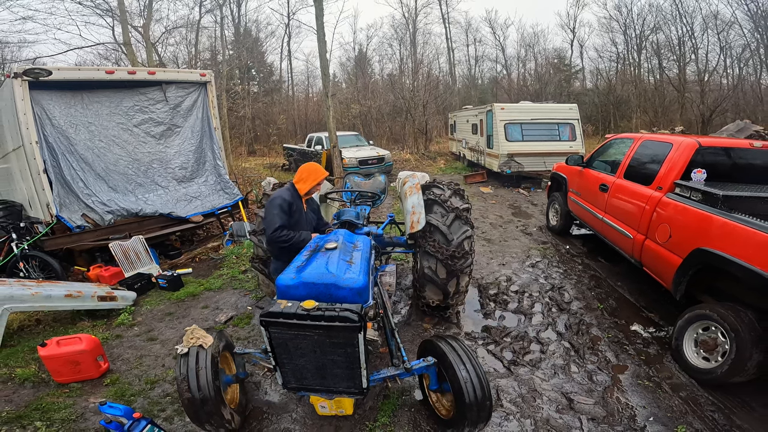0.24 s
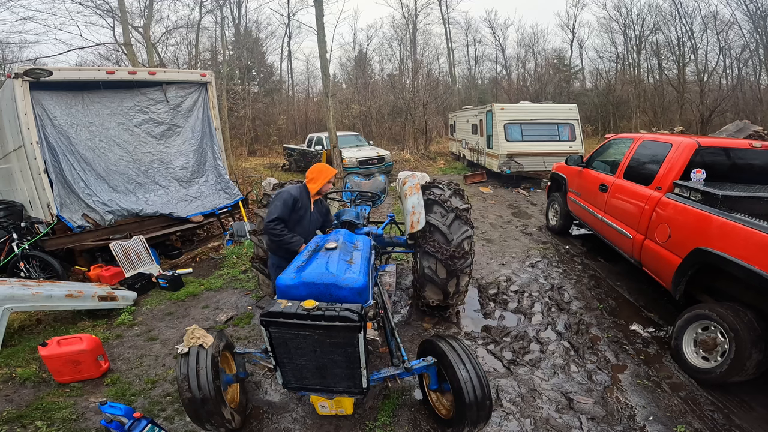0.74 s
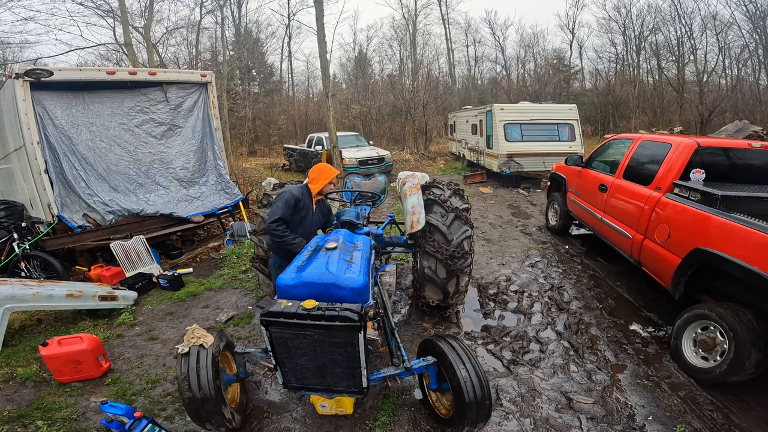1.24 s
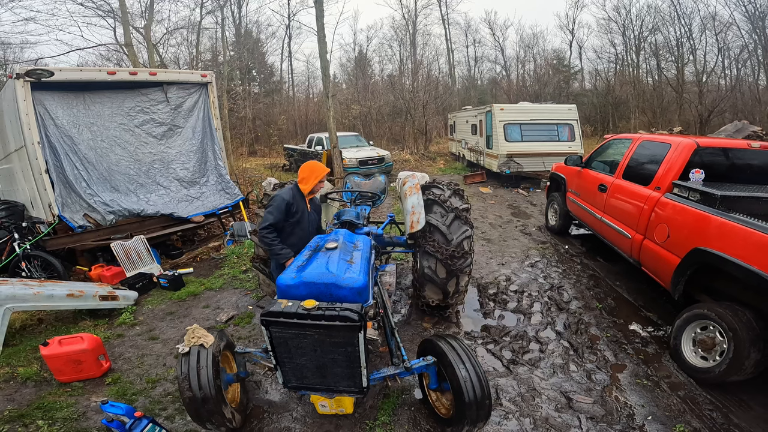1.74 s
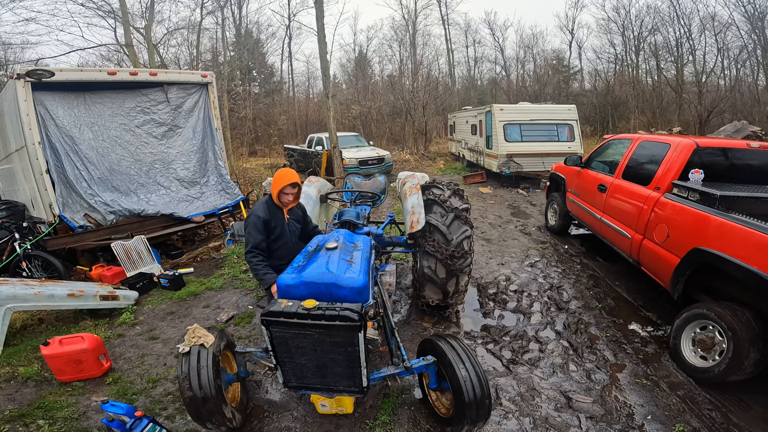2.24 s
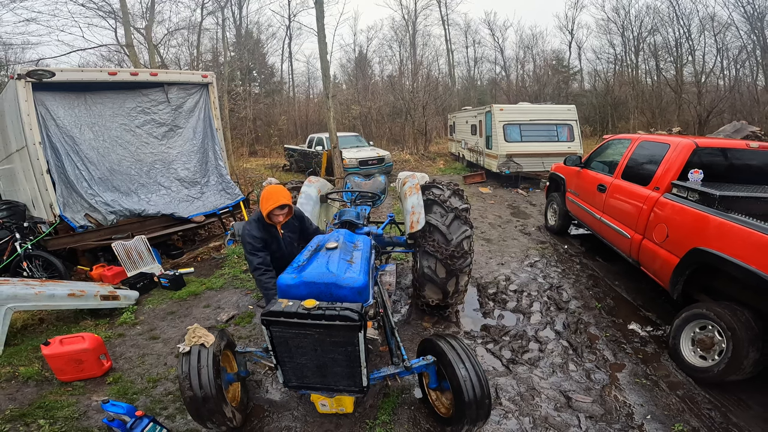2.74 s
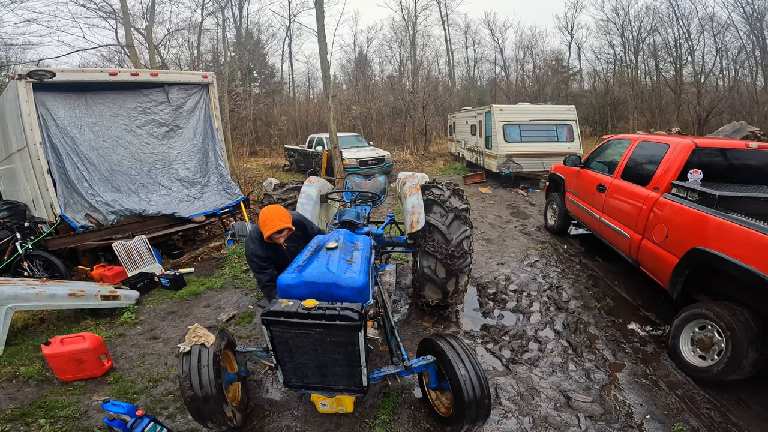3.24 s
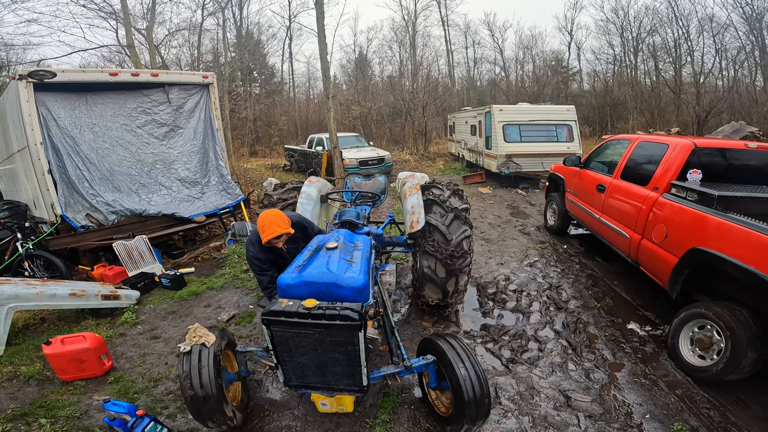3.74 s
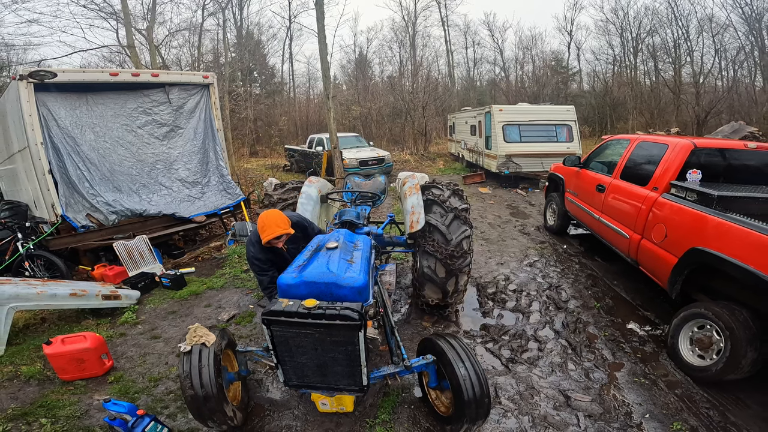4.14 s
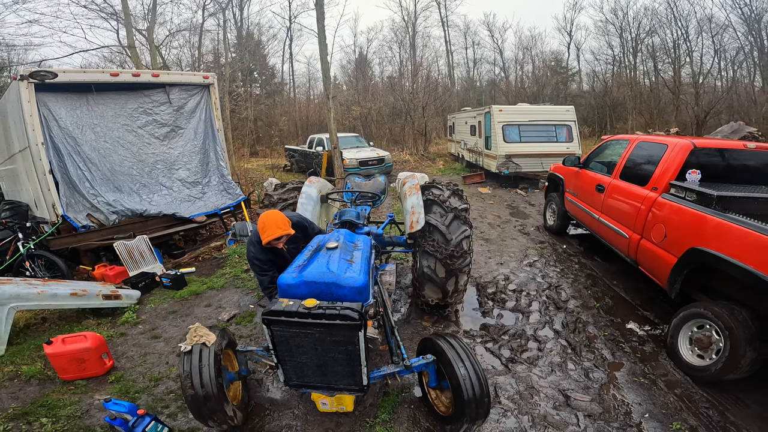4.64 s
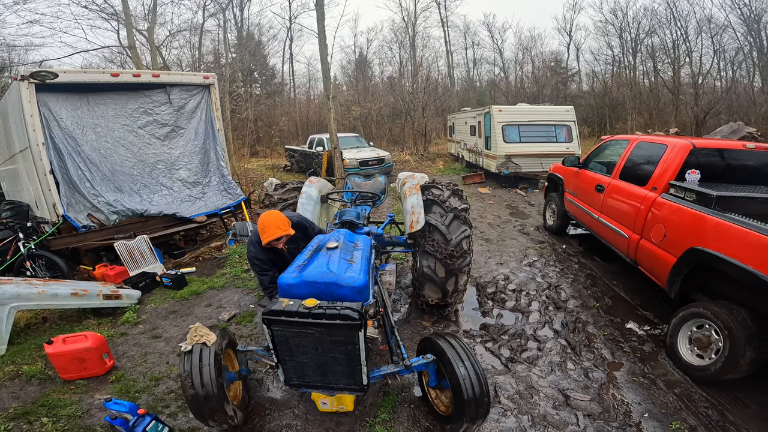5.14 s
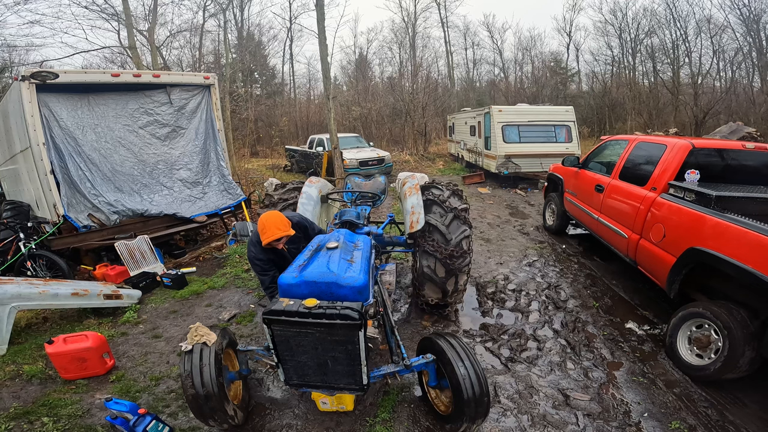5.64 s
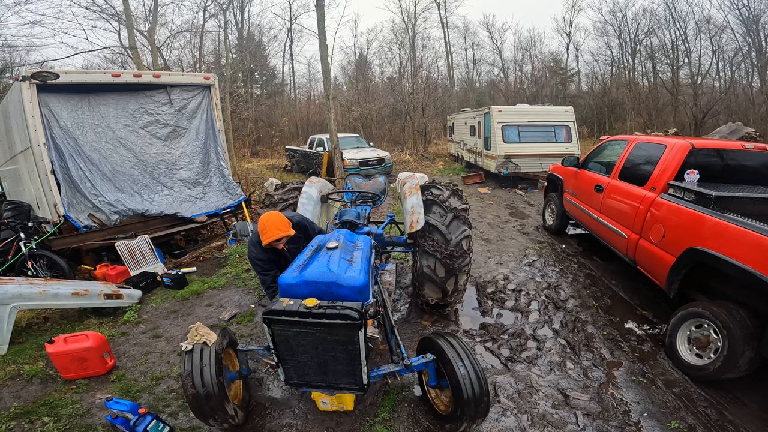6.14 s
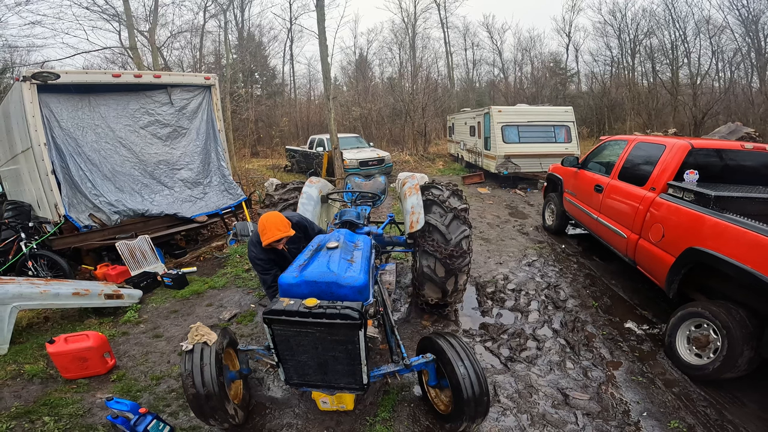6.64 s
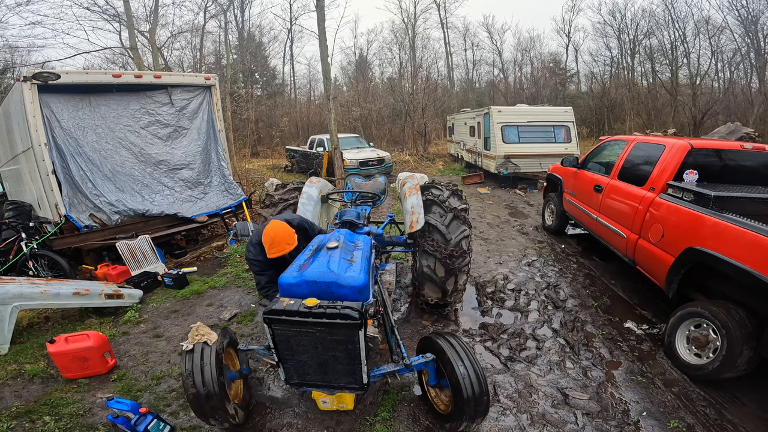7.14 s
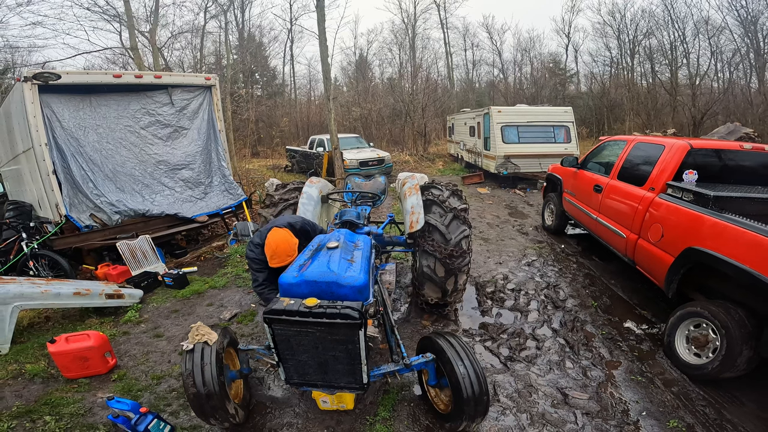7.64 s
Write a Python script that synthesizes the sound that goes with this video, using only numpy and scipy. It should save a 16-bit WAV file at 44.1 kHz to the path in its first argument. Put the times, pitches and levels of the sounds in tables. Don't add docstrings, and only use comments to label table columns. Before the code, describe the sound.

Light rain and small handling knocks in a wet yard, then a tractor starter clacks in and cranks steadily, whining and chugging without catching.

```python
import sys
import numpy as np
from scipy import signal
from scipy.io import wavfile
from scipy.ndimage import uniform_filter1d

SR = 44100
rng = np.random.default_rng(int(sys.argv[2]) if len(sys.argv) > 2 else 0)


def level_to_linear(level):
    exponent = np.asarray(level, float) / 20
    return 10 ** exponent


def wrap_up_sound(samples):
    columns = np.atleast_2d(samples).T
    tamed = np.clip(columns, -1, 1)
    steps = np.round(tamed * 32767).astype(np.int16)
    wavfile.write(sys.argv[1], SR, steps)


N = 348390
LEFT_RIGHT = np.array([[1], [-1]])

# start_s, teeth_hz, whine_db, clatter_db, groan_db
SPIN_UP = [
    (2.628, 120, -63, -27, -60),
    (2.636, 140.7, -20, -25, -22),
    (2.66, 190.4, -20, -32.5, -17.5),
    (2.72, 250.1, -21.5, -28, -18.5),
    (2.76, 281.5, -14.5, -30, -27.5),
    (2.81, 318.9, -31, -27.5, -19.5),
    (2.836, 363.7, -16.5, -29.5, -31),
]
# release_s, clatter_db, unloading_db
STROKES = [(2.84, -1, 1), (3.015, 2.5, -1), (3.163, -1, -4.5), (3.296, 0.0, -4), (3.442, -2, -5),
           (3.576, 3, -7), (3.695, -0.5, -12), (3.823, 0.3, -5.5), (3.951, 1.2, -10.5), (4.079, 0.5, -6),
           (4.212, 1.5, -9.5), (4.351, 0, -6), (4.489, -1.2, -8.5), (4.633, 0.7, -12), (4.771, 0.4, -9.5),
           (4.9, -0.7, -6.5), (5.048, -0.1, -10), (5.188, -0.2, -7), (5.327, -1, -8), (5.461, 0, -3),
           (5.583, -3, 0), (5.749, -1.5, -2), (5.904, -1.7, -3), (6.047, -0.5, -1.5), (6.206, 1.2, -5.5),
           (6.354, -1, -6.5), (6.506, 0.3, -9), (6.633, 1, -2), (6.792, -1.2, -8), (6.939, -0.5, -6.5),
           (7.082, -0.8, -8.5), (7.216, 1.5, -2.2), (7.371, -1.5, -10), (7.516, 0, -8.5), (7.65, 0, -10),
           (7.787, 1, -4)]
LAST_RELEASE_S = 7.93
# start_s, push_db, hiss_db
PUFFS = [(2.981, -25, -50), (3.127, -13, -23), (3.41, -11.5, -28.5), (3.543, -11.5, -18.5),
         (3.793, -8, -21.5), (3.922, -19, -29.5), (4.05, -21, -32.5), (4.189, -29, -53),
         (4.319, -13.5, -26), (4.457, -14, -27.5), (4.59, -26.5, -48), (4.735, -20.0, -31),
         (4.875, -14, -28), (5.012, -13.5, -27), (5.225, -48.0, -36), (5.359, -41, -48), (5.52, -37, -34),
         (5.585, -25, -47), (5.738, -25, -50)]
# start_s, peak_db, pitch_hz, left_right_db
LASH_BLOWS = [
    (2.631, -14, 1240, -5),
    (3.174, -13, 1447, 2),
    (7.527, -22, 1009, 0),
]


def rms_one(x):
    return x / np.sqrt(np.mean(x ** 2) + 1e-20)


def in_time(s, values):
    return np.interp(np.arange(N) / SR, s, values)


def at_hz(points, hz):
    points_hz, values = np.transpose(points)
    return np.interp(np.log(hz), np.log(points_hz), values)


def filtered(x, order, hz, kind="low"):
    return signal.sosfilt(signal.butter(order, hz, kind, fs=SR, output="sos"), x)


def drift(rate_hz):
    r = np.exp(-40 * np.pi * rate_hz / SR)
    slow = signal.lfilter([1], [1, -2 * r, r * r], rng.standard_normal(N // 20 + 4002))[4000:]
    return np.interp(np.arange(N) / 20, np.arange(len(slow)), rms_one(slow))


def resonances(x, modes):
    out = 0
    for k, (hz, width_hz, db) in enumerate(modes):
        r = np.exp(-np.pi * width_hz / SR)
        b = (1 - r * r) / 2 * np.array([1, 0, -1])
        a = [1, -2 * r * np.cos(2 * np.pi * hz / SR), r * r]
        out = out + (-1) ** k * level_to_linear(db) * signal.lfilter(b, a, x + 1e-18)
    return out


def coloured(pair, spectrum, patchy_db, likeness):
    # pitch_hz, left_right_db
    lean = [(60, -1), (240, 0.5), (950, -1), (3770, 3), (15000, 8)]
    out, edges_hz = 0, 110 * 2 ** np.arange(0, 7.6, .5)
    for k, (low_hz, high_hz) in enumerate(zip(edges_hz, edges_hz[1:])):
        mid, side = filtered(pair[k % 2], 2, [low_hz, high_hz], "band")
        hz = np.sqrt(low_hz * high_hz)
        alike = np.clip(at_hz(likeness, hz), 0, 1)
        level_db = at_hz(spectrum, hz) + patchy_db * drift(10.4)
        gain = level_to_linear(level_db + at_hz(lean, hz) * LEFT_RIGHT / 2)
        out = out + gain * (np.sqrt(1 + alike) * mid + np.sqrt(1 - alike) * side * LEFT_RIGHT)
    return rms_one(out)


def taps(table, decay_s, looseness, trim_db):
    out, t = np.zeros((2, N)), np.arange(SR // 10) / SR
    noise = rng.standard_normal((len(table), len(t))) * np.exp(-t / decay_s)
    for (s, db, hz, pan_db), burst in zip(table, noise):
        tap = resonances(burst, [(hz, looseness * hz, 0)])
        tap = resonances(tap, [(hz, 3.1 * hz, 0)])
        gain = level_to_linear(db + trim_db + pan_db * LEFT_RIGHT / 2)
        out[:, round(s * SR):][:, :len(t)] += gain * tap / abs(tap).max()
    return out


def rain():
    # pitch_hz, level_db
    spectrum = [(71, -36), (120, -10.5), (153, 2), (180, -4.5), (310, -12.5), (446, -9.5), (655, -13),
                (923, -13.5), (1090, -7.5), (2200, -12.5), (4030, -18), (5350, -18), (12300, -40),
                (15000, -43)]
    # pitch_hz, likeness_0_to_1
    yard_likeness = [(60, 0.58), (180, 0.92), (550, 0.81), (1650, 0.61), (4970, 0.56), (15000, 0.37)]
    rain_db, shift_db = -37, 0.4
    landed = rng.random((2, 2, N)) < 250 / SR
    drops = 3.0 * landed * level_to_linear(2.8 * rng.exponential(1, (2, 2, N)))
    hiss = coloured(rng.standard_normal((2, 2, N)) + drops, spectrum, patchy_db=1.22, likeness=yard_likeness)
    return level_to_linear(rain_db + in_time([2.6, 2.65], [0, shift_db])) * hiss


def wind():
    # start_s, level_db
    gusts = [(0.0, -47), (0.37, -45), (0.72, -47.5), (1.08, -42.5), (1.47, -45.5), (2.42, -43.5),
             (2.66, -42), (3.63, -44), (3.98, -42), (4.95, -44), (5.19, -49), (6.4, -50), (6.58, -47),
             (7.9, -55)]
    mid, side = filtered(rng.standard_normal((2, N)), 2, [22, 75], "band")
    buffet = rms_one(mid + (0.13 * side + 0.039 * mid) * LEFT_RIGHT)
    return buffet * level_to_linear(in_time(*np.transpose(gusts)) + 3.1 * drift(11) + 5.0)


def drips():
    # start_s, peak_db, pitch_hz, left_right_db
    near_drops = [(0.0954, -41, 5500, 3.0), (0.2684, -32, 5870, 0.5), (0.4054, -41, 6650, 3.0),
                  (0.4773, -33, 7000, 4.0), (0.6034, -30, 6900, 2.5), (0.7714, -27, 5870, 1.5),
                  (0.8654, -28, 7000, 4), (1.18, -28, 6030, 8), (1.2291, -31, 7000, 6),
                  (1.5034, -43, 7110, 2.5), (1.7275, -26, 5900, 10), (1.8063, -34, 6830, 2.5),
                  (2.0394, -27, 5590, 1.5), (2.1154, -27, 5520, 3.5), (2.2504, -28, 6040, 4)]
    return taps(near_drops, decay_s=.003, looseness=0.24, trim_db=-4.5)


def handling():
    # start_s, peak_db, pitch_hz, left_right_db
    knocks = [(0.134, -31, 1740, 1.5), (0.657, -27.5, 1320, 6), (0.938, -29, 2570, 1.0),
              (1.134, -26, 1700, 2), (1.15, -28, 800, 2), (1.227, -31, 1000, 1.5), (1.289, -29.5, 800, 1.0),
              (1.339, -26, 900, -0.5), (1.359, -33, 1000, 0.5), (1.956, -32, 1180, 5),
              (2.09, -23, 1120, -3), (2.12, -31, 1300, 3), (2.279, -30, 2800, 0.0), (2.399, -34, 450, 8),
              (2.459, -29, 447, 6), (2.544, -20, 1390, 2)]
    # start_s, peak_db, pitch_hz, left_right_db
    ticks = [
        (1.182, -24, 2200, 5),
        (2.116, -18, 900, 3),
        (2.285, -20, 1900, .1),
        (2.308, -21.5, 500, -10),
        (2.341, -26, 1410, 1.5),
    ]
    # start_s, peak_db, pitch_hz, left_right_db
    rustles = [
        (1.13, -32, 900, 2),
        (1.275, -32, 900, 1.5),
        (1.335, -28, 700, .1),
        (2.085, -24, 1500, .1),
        (2.125, -31, 1300, 2),
    ]
    out = taps(knocks, decay_s=0.0093, looseness=0.27, trim_db=-1.5)
    out += taps(ticks, decay_s=0.0016, looseness=0.61, trim_db=-1.0)
    return out + taps(rustles, decay_s=.03, looseness=0.77, trim_db=-1.5)


def squeaks():
    # start_s, peak_db, pitch_hz, left_right_db
    whistles = [
        (1.46, -35, 3510, 2),
        (4.303, -18, 6050, 1),
        (4.858, -18, 6200, 1),
    ]
    return taps(whistles, decay_s=.016, looseness=.025, trim_db=0)


def strokes():
    # extra_speed_loss_0_to_1, whine_db, frame_shake_db
    cylinders = [(0.01, 0.5, 1), (0, 0.3, -1), (0.01, -0.4, 1), (0, .5, -2.5)]
    s = np.transpose(STROKES)[0]
    share = in_time(np.append(s, LAST_RELEASE_S), np.arange(len(s) + 1)) % 1
    return s, share, np.tile(np.transpose(cylinders), len(s) // len(cylinders))


def frame():
    # stroke_share, level_db
    shake_swing = [(0, -4.5), (.25, -10), (.45, -3.5), (.62, -1), (.85, 0.5), (1, -5.5)]
    running_db, take_up_s = -31, .025
    lurch_db, lurch_s, lurch_fade_db_per_s = 12, 2.65, 21
    rock_db, rock_t60_s = -35, 0.42
    s, share, (_, _, shake_db) = strokes()
    t, shake = np.arange(N) / SR, rng.standard_normal(N)
    boom = resonances(shake, [(137, 42, -16.5), (163.3, 13.3, -1.5), (178.5, 15, -1.5)])
    boom = filtered(boom, 2, 260)
    boom = boom / (uniform_filter1d(boom ** 2, size=900) + 1e-12) ** 0.21
    stroke_db = (t > s[0]) * (np.interp(share, *np.transpose(shake_swing)) + in_time(s + 0.11, shake_db))
    first_db = np.maximum(lurch_db - lurch_fade_db_per_s * abs(t - lurch_s), 0)
    since_s = share * in_time(s[1:], np.diff(s))
    fade_db = uniform_filter1d(60 * since_s / rock_t60_s, size=1000)
    rock = rms_one(resonances(shake, [(66.4, 13.5, 0)])) * level_to_linear(rock_db - fade_db)
    moving = np.clip((t - SPIN_UP[0][0]) / take_up_s, 0, 1)
    return (rms_one(boom) * level_to_linear(running_db + stroke_db + first_db) + rock) * moving


def exhaust():
    push, hiss = np.zeros(N), np.zeros(N)
    t = np.arange(-.04, .08, 1 / SR)
    # centre_s, width_s, size
    pulses = [(-.021, 0.00092, 0.28), (-.007, 0.00086, 0.33), (0, 0.0026, -0.83),
              (.012, 0.0028, 0.33), (.029, .004, .3), (.044, 0.013, 0.046)]
    shape = sum(size * np.exp(-.5 * ((t - at) / width) ** 2) for at, width, size in pulses)
    opening = np.exp((t + 0.014) / 0.0026)
    closing = np.exp(-(np.maximum(t + 0.026, 0) / 0.028) ** 2)
    burst = np.where(t < -.018, opening, closing)
    for s, push_db, hiss_db in PUFFS:
        i = round((s - .04) * SR)
        push[i:i + len(t)] += level_to_linear(push_db) * shape
        hiss[i:i + len(t)] += level_to_linear(hiss_db) * burst
    mid, side = filtered(rng.standard_normal((2, N)), 2, [4500, 10500], "band")
    jet = rms_one(mid + 0.34 * side * LEFT_RIGHT)
    low = rms_one(filtered(rng.standard_normal(N), 1, [120, 1500], "band"))
    push += resonances(push, [(120, 67, 5.4), (220, 53, 12.0), (310, 93, 8.3)])
    return push + hiss * (jet + level_to_linear(6.0) * low)


def clack():
    # pitch_hz, level_db, fade_s (time to fall by 110 dB)
    ring_modes = [(3460, 7, 0.022), (4250, 12, 0.035), (5170, 3, 0.05), (5400, 3, 0.05), (6700, 15, 0.048),
                  (8150, -16, 0.15), (8500, -23, 0.099), (9491, -26, 0.088), (12100, -3, 0.05)]
    # start_s, level_db
    hits = [
        (2.609, -17),
        (2.6116, -21),
        (2.617, -16.5),
        (2.633, -40),
    ]
    out, t = np.zeros(N), np.arange(SR // 5) / SR
    for s, hit_db in hits:
        ring = 0
        for hz, level_db, fade_s in ring_modes:
            ring = ring + level_to_linear(level_db + rng.normal(0, 5.3) - 110 * t / fade_s) * np.sin(2 * np.pi * hz * t)
        crack = 1.6 * rng.standard_normal(len(t)) * np.exp(-t / 0.0075)
        crack = filtered(crack, 1, 9000)
        out[round(s * SR):][:len(t)] += level_to_linear(hit_db) * (.2 * ring + 1.15 * crack)
    return filtered(out, 2, [600, 12500], "band")


def lash():
    return taps(LASH_BLOWS, decay_s=0.028, looseness=0.3, trim_db=-4.0)


def floating():
    gap_s, gap_db = .01, -6
    t = np.arange(N) / SR
    return level_to_linear(sum(gap_db * (t < s) * np.exp(-((s - t) / gap_s) ** 2) for s, *_ in LASH_BLOWS[1:]))


def crank():
    # start_s, free_teeth_hz, compression_loss_0_to_1, effort_db, held_stroke_share
    shaft_course = [(2.84, 395, 0.11, 2, 0.31), (3.012, 457, 0.07, -2, .3), (3.164, 507, 0.16, 1, .25),
                    (3.294, 486.5, 0.09, -0.5, .25), (3.441, 524.4, .05, -1.5, .3),
                    (3.573, 545.3, .1, -0.5, .3), (3.822, 539.2, 0.08, -0.5, .3),
                    (4.077, 521.9, 0.15, 2, .25), (4.63, 504.8, 0.18, 0.3, 0.26),
                    (5.187, 505.5, .16, 0, .3), (5.457, 489.5, 0.13, 1, 0.34),
                    (5.595, 470.6, 0.14, -2, 0.53), (5.908, 475, .13, -1.5, .45),
                    (6.203, 492, 0.17, -0.2, 0.29), (6.937, 499.2, 0.18, 0, .33),
                    (7.369, 499.4, 0.19, 0.2, .28), (7.648, 504.6, .16, 0, .28), (7.787, 494, 0.08, 2, .35)]
    # stroke_share, unloading_0_to_1, whine_db, clatter_db, contact_0_to_1
    gear_load = [(0, 0.87, 5, -2, 0.15), (.04, 0.96, -1.5, 2.5, 0.35), (.1, 0.22, -3, 0, 0.57),
                 (.25, 0, 0, 2.5, 0.76), (.5, 0, 0, 0.5, 0.74), (.7, 0, -3, -0.5, .8),
                 (.88, 0.39, -1.5, 2.5, 0.43), (1, 1, -0.5, -2.5, 0.2)]
    # stroke_share, level_db
    sump_load = [(0, -8), (.1, -4.5), (.3, 0), (.45, -4), (.6, -17), (.75, -5.5), (.88, 2.5), (1, -2.5)]
    whine_mean_db, clatter_mean_db, clatter_follows, sump_db = -20, -28.9, 0.75, -32.5
    risen_at, sunk_at, rising_at = .13, .76, .9
    fire_help, weak_fire_db, full_fire_db = .4, -28, -12
    unload_scale, groan_running_db, groan_fade_s = 1.18, -33.5, 3.14

    t = np.arange(N) / SR
    s, share, (more_loss, cylinder_db, _) = strokes()
    _, stroke_clatter_db, release_db = np.transpose(STROKES)
    ends = np.append(s, LAST_RELEASE_S)
    length_s = np.diff(ends)
    s0, hz0, whine0, clatter0, groan0 = np.transpose(SPIN_UP)
    at_s, *shaft = np.transpose(shaft_course)
    fast, loss, effort_db, held = [np.interp(s, at_s, column) for column in shaft]

    fired = np.zeros(len(s))
    for puff_s, push_db, _ in PUFFS:
        fired[np.searchsorted(s, puff_s) - 1] = np.interp(push_db, [weak_fire_db, full_fire_db], [0, 1])
    slow = fast * (1 - (loss + more_loss) * (1 - fire_help * fired))
    turns_s = np.transpose([s + at * length_s for at in (risen_at, held, sunk_at, rising_at)]).ravel()
    turns_hz = np.transpose([.985 * fast, fast, 1.015 * slow, slow]).ravel()
    rate = in_time(np.append(s0, turns_s), np.append(hz0, turns_hz))
    rate = uniform_filter1d(rate, size=700)

    at, free, more_whine, more_clatter, touch = np.transpose(gear_load)
    running, powered = t > s[0], t > s0[0]
    middle_s = s + .5 * length_s
    nearest = np.clip(np.searchsorted(middle_s, t), 0, len(s) - 1)
    unload = running * np.interp(share, at, free) * (unload_scale * release_db)[nearest]
    level_s = np.append(s0, middle_s)
    whine = in_time(level_s, np.append(whine0, whine_mean_db + effort_db + cylinder_db))
    whine += running * np.interp(share, at, more_whine) + 0.73 * unload
    clatter = in_time(level_s, np.append(clatter0, clatter_mean_db + clatter_follows * stroke_clatter_db))
    clatter += running * np.interp(share, at, more_clatter) + 0.92 * unload
    groan = in_time([*s0, 2.98, groan_fade_s], [*groan0, -25, groan_running_db]) + unload

    contact = np.where(running, np.interp(share, at, touch), .55)
    contact *= np.interp(rate, [505, 560], [1, .55])
    pan_db = sump_db + np.interp(share, *np.transpose(sump_load)) + in_time(s, effort_db)
    return rate, contact, running * level_to_linear(pan_db), powered * level_to_linear(whine), powered * level_to_linear(clatter), powered * level_to_linear(groan)


def starter():
    # pitch_hz, width_hz, level_db
    housing_modes = [(439, 27, -18.5), (499, 30, -12), (620, 72, -14), (787, 21, -7.5), (831, 34, -5.5),
                     (908, 27, 4), (1030, 25, -6.5), (1083, 40, -6), (1278, 127, -7), (1415, 34, -2.5),
                     (1487, 79, -9), (1713, 180, -11), (1940, 170, -25)]
    # pitch_hz, width_hz, level_db
    panel_modes = [(2480, 42, -7.5), (4150, 68, 5), (4890, 12, -10), (2913, 127, 3.5), (3382, 61, 5),
                   (3770, 38, 7), (3950, 24, -2.5), (4330, 8.2, -3), (4494, 13, -5.5), (6050, 54, -3),
                   (6600, 52, -21), (6890, 170, -3.5), (7440, 160, -2.5)]
    # pitch_hz, width_hz, level_db
    sump_modes = [(465.6, 41.5, -1.5), (492, 29.5, -0.5)]
    # pitch_hz, width_hz, level_db
    block_modes = [(492, 63, -13.5), (635, 29, -7), (923, 13.7, 0.5), (1010, 22, -3), (1405, 38, -3.5)]
    # pitch_hz, width_hz, level_db
    mount_modes = [(253, 41, -5.5), (335, 63, -7), (586, 104, 1), (750, 340, -9), (1180, 47, -0.5)]
    # pitch_hz, density_db_per_hz
    clatter_spectrum = [(150, -57), (260, -27), (380, -39), (500, -16.5), (800, -21.5), (1400, -8.5),
                        (1900, -24), (2300, -20.5), (3500, -22.5), (7300, -26.5), (8300, -40.5),
                        (12000, -46.5), (15000, -64)]
    # pitch_hz, likeness_0_to_1
    clatter_likeness = [(200, 1.0), (1500, 0.81), (4000, 0.53), (8000, 1.0), (11000, 0.27), (13000, .05)]

    rate, contact, sump, whine, clatter, groan = crank()
    teeth = np.cumsum(rate * (1 + .01 * drift(45))) / SR + .025 * drift(250)
    struck = np.diff(np.floor(teeth), prepend=0) > 0
    bite_db = 1.8 * drift(45)
    blows = struck * contact * level_to_linear(1.96 * rng.standard_normal(N) + bite_db)
    grind = 0.023 * rng.standard_normal(N)

    housing = filtered(resonances(blows + grind, housing_modes), 2, 390, "high")
    housing = rms_one(housing) * whine
    housing += rms_one(resonances(rng.standard_normal(N), sump_modes)) * sump
    housing += rms_one(resonances(rng.standard_normal(N), block_modes)) * np.sqrt(whine) * level_to_linear(-17.0)
    housing += rms_one(resonances(blows + 2.4 * grind, mount_modes)) * groan

    gate = 1 + 0.28 * np.cos(2 * np.pi * teeth)
    rattle = rng.standard_normal((2, 2, N)) * gate * level_to_linear(0.99 * drift(63))
    wide = coloured(rattle, clatter_spectrum, patchy_db=2.5, likeness=clatter_likeness)
    knocks = rattle[0, 0] + 11 * blows
    panels = rms_one(sum(resonances(knocks, [mode]) * level_to_linear(4.1 * drift(14.3)) for mode in panel_modes))
    tooth_clicks = filtered(blows, 2, [2200, 5500], "band")
    panels += level_to_linear(-4.0) * rms_one(tooth_clicks)
    return housing, clatter * (level_to_linear(4.0) * wide + level_to_linear(-4.5) * panels)


def outdoors(x):
    # delay_s, level_db
    echoes = [(.0031, -22), (.0087, -9), (.017, -10), (.029, -26)]
    out, thin = np.array([x, x]), filtered(x, 1, 450, "high")
    for k, (delay_s, db) in enumerate(echoes):
        delay = round(delay_s * SR)
        out[k % 2, delay:] += level_to_linear(db) * thin[:-delay]
    return out


def scene():
    background = rain() + wind() + drips() + handling() + squeaks()
    housing, rattle = starter()
    float_gain = floating()
    engine = outdoors(housing * float_gain + clack()) + rattle * float_gain + lash()
    return background + frame() + exhaust() + engine


def roll_off(x):
    return signal.sosfilt(signal.butter(12, 15600, fs=SR, output="sos"), x)


def record(dry):
    band = filtered(dry.mean(axis=0), 1, [1500, 5000], "band")
    ports = dry - 0.28 * np.gradient(band) * LEFT_RIGHT
    top = filtered(dry, 2, 8500, "high")
    ports += top * [[.3], [-.45]]
    dull = filtered(ports, 4, 12600)
    rounded = 0.92 * np.tanh(dull / 0.84)
    rounded = signal.sosfilt(signal.cheby2(18, 50, 15650, fs=SR, output="sos"), rounded)
    return roll_off(rounded)


dry = scene()
out = record(dry)
wrap_up_sound(out)
```